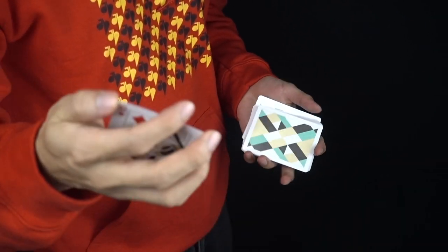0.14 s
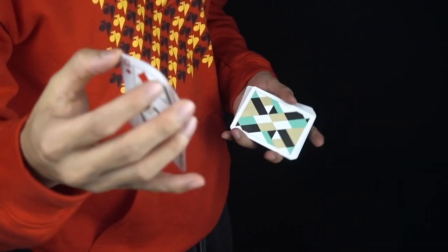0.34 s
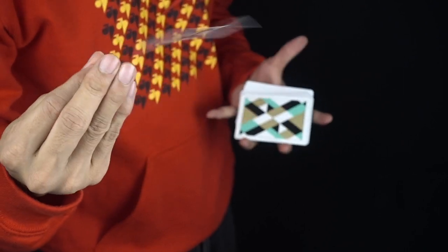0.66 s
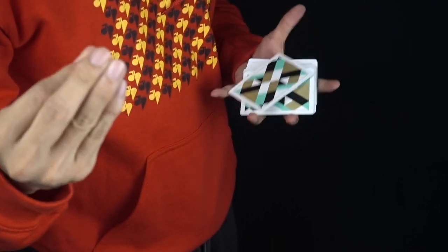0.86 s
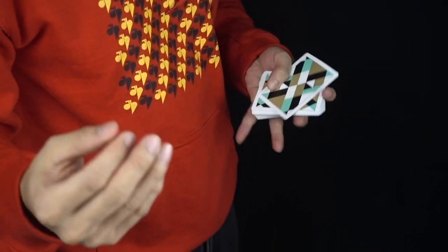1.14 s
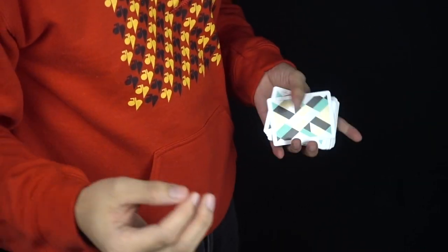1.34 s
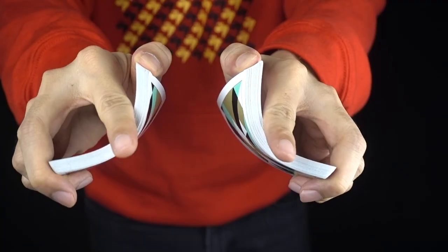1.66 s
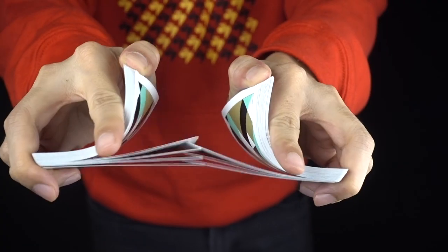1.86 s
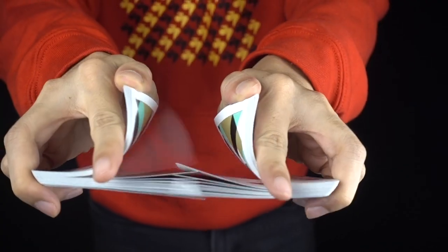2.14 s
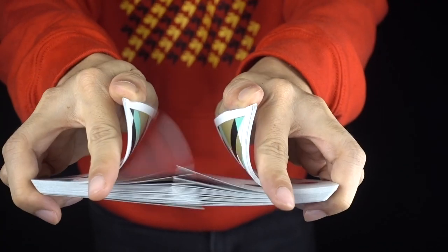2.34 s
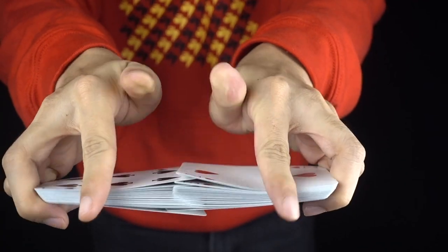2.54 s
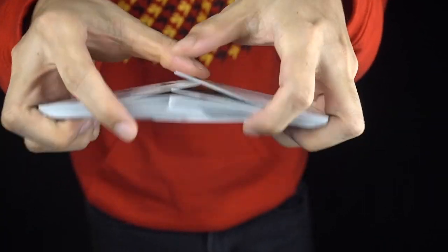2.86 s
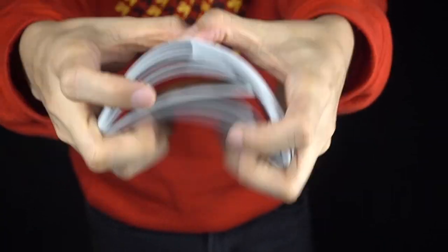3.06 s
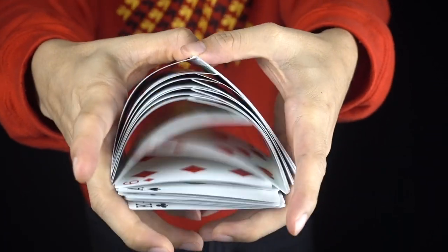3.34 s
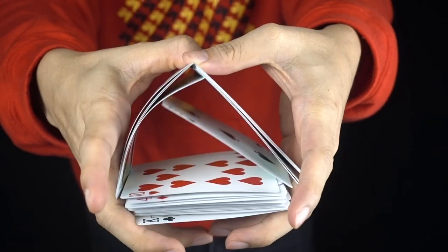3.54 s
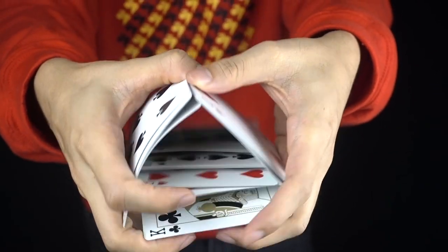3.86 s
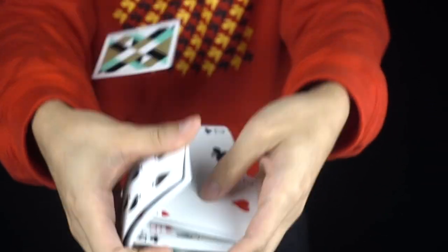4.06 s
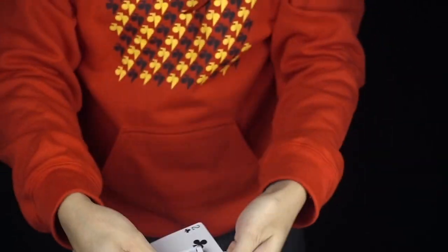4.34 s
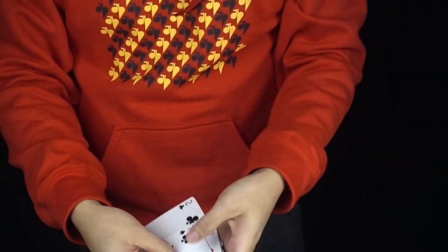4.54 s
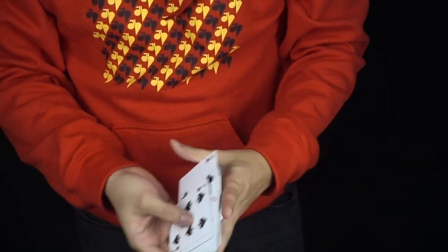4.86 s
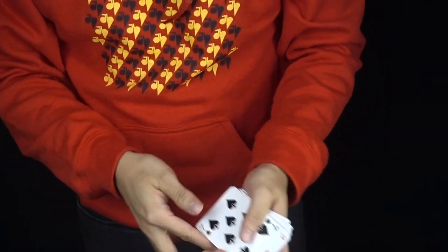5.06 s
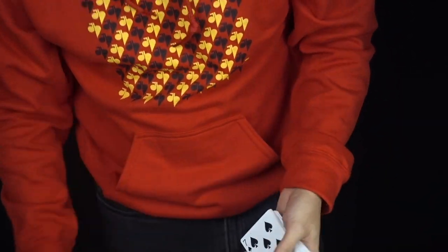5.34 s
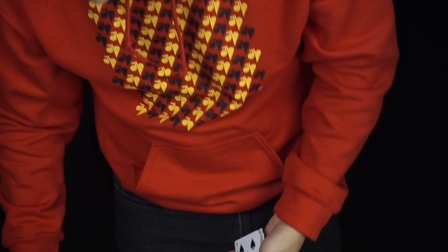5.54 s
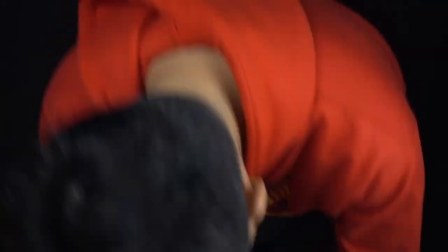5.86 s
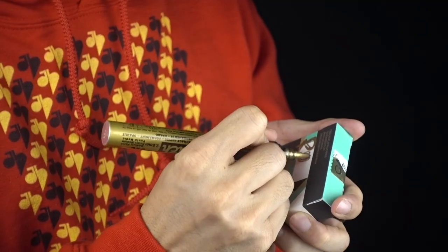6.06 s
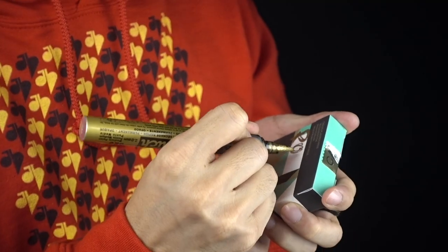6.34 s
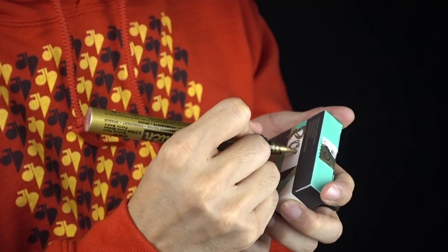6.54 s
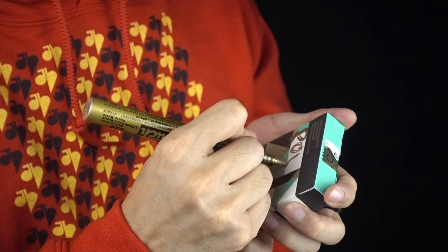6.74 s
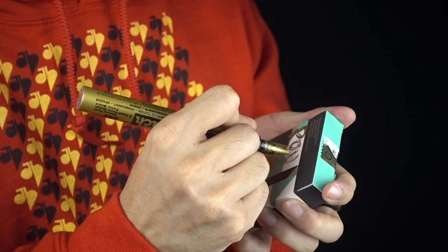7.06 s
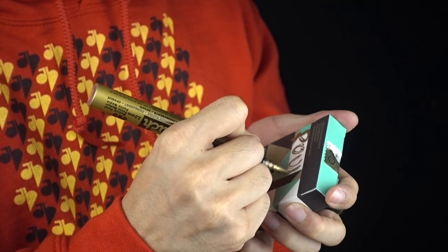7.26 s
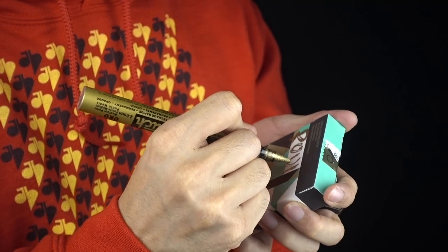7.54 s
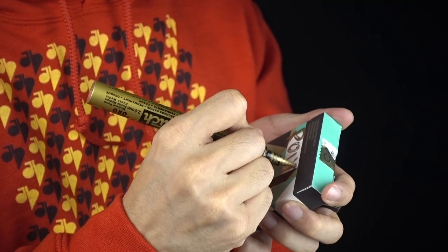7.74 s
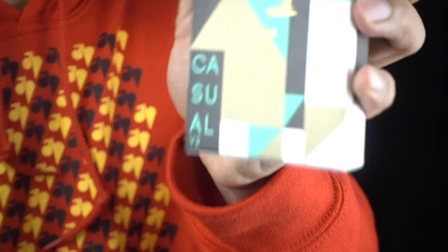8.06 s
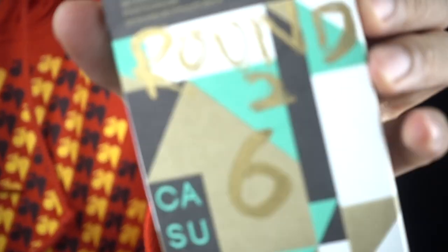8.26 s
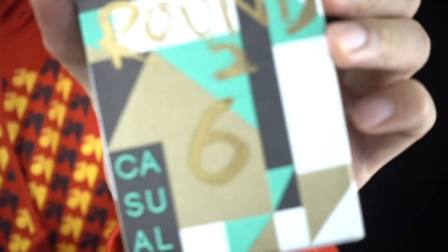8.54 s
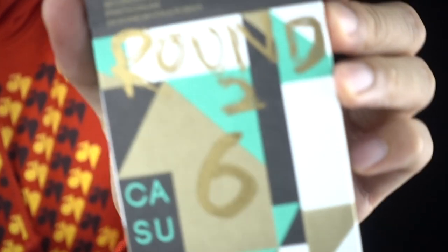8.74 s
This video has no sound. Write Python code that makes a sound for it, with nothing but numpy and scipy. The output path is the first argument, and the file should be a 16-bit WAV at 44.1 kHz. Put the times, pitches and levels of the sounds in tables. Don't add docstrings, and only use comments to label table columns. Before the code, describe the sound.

Close stereo microphones in a small quiet room. A single sharp card slap comes first, then a crisp riffle of ticking card edges ending in two harder snaps. A soft airy bridge flutter follows, then light fumbling and a loud burst of cards hitting the floor with a flat second landing. Later, faint felt marker rubs on a hollow card box and tiny finger touches, over ventilation hum and hiss.

```python
import sys
import numpy as np
from scipy import signal
from scipy.fft import rfft, irfft, next_fast_len
from scipy.io import wavfile
from scipy.ndimage import map_coordinates

SR = 44100
rng = np.random.default_rng(int(sys.argv[2]) if len(sys.argv) > 2 else 0)


def attenuation_scalar(level_db):
    decades = np.asarray(level_db, float) / 20
    return 10 ** decades


def pcm_store(signal):
    levels = np.round(np.clip(np.atleast_2d(signal), -1, 1) * 32767)
    wavfile.write(sys.argv[1], SR, levels.astype(np.int16).T)


N = 392479

# t/s, pressure level/dB, cupping of the hands/0-1
HAND_PRESSURE = [
    [(1.8, -56, 0.6), (1.81, -41, 0.76), (2.0, -48, 0.93), (2.04, -40, 0.6), (2.348, -31.5, 0.16),
     (2.48, -36, 0.54), (2.574, -26.5, 0.35), (2.586, -45, 0.4), (2.64, -42, 0.44)],
    [(3.05, -76, .4), (3.125, -61, 0), (3.145, -37, 0.04), (3.256, -32, 0.39), (3.296, -36, 0.1),
     (3.402, -36, 0), (3.45, -37, 0), (3.558, -33, 0.24), (3.64, -57, 0.3)],
]


def unit(x):
    return x / np.sqrt(np.mean(x ** 2) + 1e-20)


def along(points, hz):
    f, v = np.transpose(points)
    return np.interp(np.log(hz + 1), np.log(f + 1), v)


def curves(tables):
    t, silence_db = np.arange(N) / SR, -150
    total = 0
    for table in tables:
        s, *columns = np.transpose(table)
        total = total + np.array([np.interp(t, s, c - silence_db, 0, 0) for c in columns])
    return silence_db + total


def swells(s, db, rise, held, fall):
    t = np.arange(N) / SR - s
    below_db = np.maximum(-t * rise, (t - held) * fall)
    return attenuation_scalar(db - np.maximum(below_db, 0))


def placed(times, shapes):
    at = np.round(times * SR).astype(int) + np.arange(shapes.shape[1])
    return np.bincount(at.ravel(), shapes.ravel(), N + SR)[:N]


def filtered(x, response):
    m = next_fast_len(N + SR // 2)
    return irfft(rfft(x, m) * response(np.fft.rfftfreq(m, 1 / SR)), m)[..., :N]


def colour(spectrum):
    return lambda hz: attenuation_scalar(along(spectrum, hz))


def modes(table):
    def response(f):
        total = 0
        for k, (centre, width, db) in enumerate(table):
            damping = 1j * f * width
            total = total + (-1) ** k * attenuation_scalar(db) * damping / (centre * centre - f * f + damping)
        return total
    return response


def gritty(rate_hz, depth_db, response):
    knots = rng.standard_normal(int(N * rate_hz / SR) + 4)
    jumps = attenuation_scalar(depth_db * map_coordinates(knots, [np.arange(N) * rate_hz / SR], order=1))
    return unit(filtered(jumps * rng.standard_normal(N), response))


def spread(pair, alike):
    turn = lambda hz: np.arccos(np.clip(along(alike, hz), -1, 1)) / 2
    mid, side = filtered(pair, lambda hz: np.array([np.cos(turn(hz)), np.sin(turn(hz))]))
    return np.array([mid + side, mid - side])


def air():
    # f/Hz, density level/dB
    vent_spectrum = [(41, -33.5), (70, -7), (179, -6), (217, -9.5), (272, -1.5), (342, -8.5), (444, -3.5),
                     (566, -10), (686, -5), (972, -12), (1060, -8.5), (1240, -12.5), (2090, -10.5),
                     (4500, -29.5), (5850, -51.5), (9900, -120)]
    hiss_spectrum = [(1470, -23), (2500, 0), (15100, -5), (16000, -7.5), (16500, -33)]
    # f/Hz, likeness/0-1
    diffuse_likeness = [(60, 0.97), (240, 0.88), (950, 0.48), (3770, 0.059), (15000, 0.01)]
    # t/s, level/dB
    background_level = [(0, 0.5), (1.75, 0.5), (1.8, 0.5), (3.1, 3), (3.7, 4.5), (5, 3.5), (5.9, 1.25), (8.9, 0)]
    # t/s, level/dB
    traffic_level = [(0, -79), (1.8, -84), (3.7, -82), (7.8, -75.5), (8.9, -70.5)]
    vent_db, hiss_db, hiss_growth = -59, -65, 1.7
    (background_db,), (traffic_db,) = curves([background_level]), curves([traffic_level])

    def layer(spectrum):
        noise = filtered(rng.standard_normal((2, N)), colour(spectrum))
        return unit(spread(noise, diffuse_likeness))

    vent = attenuation_scalar(vent_db + background_db) * layer(vent_spectrum)
    hiss = attenuation_scalar(hiss_db + hiss_growth * background_db) * layer(hiss_spectrum)
    traffic = attenuation_scalar(traffic_db) * layer([(15, -42.5), (30, 4.5), (60, -2.5), (90, -10.5), (130, -41)])
    return vent + hiss + traffic


def room(x):
    # f/Hz, t60/s
    decay_t60 = [(200, 0.352), (1400, 0.26), (3700, 0.36), (10000, 0.3)]
    # f/Hz, likeness/0-1
    answer_likeness = [(100, 1), (1000, 0.88), (2500, 0.87), (5000, 0.), (12000, 0.1)]
    hz, t, z = signal.stft(rng.standard_normal((2, SR // 2)), SR, nperseg=256)
    tail = signal.istft(z * attenuation_scalar(-60 * t / along(decay_t60, hz)[:, None]), SR, nperseg=256)[1]
    tail = tail / np.linalg.norm(tail[0])
    late = signal.fftconvolve(np.pad(x, (300, 0))[None], tail, axes=1)[:, :N]
    walls = colour([(200, -12.5), (1000, -8.5), (2500, -8.0), (6000, -8.0), (14000, -12.0)])
    return spread(filtered(late, walls), answer_likeness)


def panel(x):
    # delay/s, level/dB
    echoes = [
        (.0098, -5),
        (.0195, -15),
        (.031, -19),
    ]
    # from t/s, to t/s
    facing_span = (1.7, 2.7)
    copies = sum(attenuation_scalar(db) * np.roll(x, round(s * SR)) for s, db in echoes)
    facing = np.interp(np.arange(N) / SR, facing_span, [1, 1], .4, .4)
    return facing * filtered(copies, colour([(2000, -12), (4500, -1), (12000, 0)]))


def ports(x):
    # f/Hz, phase/rad
    port_phase = [(2900, 0), (3600, .8), (4350, 2.6), (5100, 1.7), (6000, 0), (12000, .1)]
    # f/Hz, level/dB
    scatter_spectrum = [(800, -34.5), (2500, -10.5), (4500, -2.5), (8000, -5), (14000, -7)]
    # from t/s, to t/s
    off_axis = [
        (.69, .85),
        (4.43, 4.95),
    ]
    n = np.arange(N)
    away = x * sum((n > a * SR) & (n < b * SR) for a, b in off_axis)
    lead = lambda hz: np.exp(.5j * along(port_phase, hz) * np.array([[1], [-1]]))
    front = filtered(np.array([x - away] * 2), lead)
    dulled = filtered(away, colour([(8000, -2), (14000, -6.0)]))
    restless = unit(filtered(rng.standard_normal(N), colour([(150, 0.0), (400, -44.5)])))
    side = filtered(x * restless, colour(scatter_spectrum))
    return front + dulled + np.array([side, -side])


def fingers():
    # t/s, f/Hz, level/dB, half length/s
    palm_pop = (.553, 635, -45, .007)
    # t/s, level/dB
    squeak_level = [
        [(8.44, -67), (8.475, -70), (8.5, -60), (8.54, -62), (8.543, -50), (8.56, -66), (8.6, -62), (8.62, -80)],
    ]
    s, hz, db, half_s = palm_pop
    t = np.arange(N) / SR - s
    pop = attenuation_scalar(db) * np.exp(-(t / half_s) ** 4) * np.sin(2 * np.pi * hz * t)
    slip = gritty(rate_hz=75, depth_db=1.0, response=colour([(2350, -35.0), (2680, 0.), (3050, -34)]))
    return pop + attenuation_scalar(curves(squeak_level)[0]) * slip


def marker():
    # t/s, swelling/dB per s, held/s, pressure level/dB, box over barrel/dB
    strokes = [(6.02, 9000, 0.041, -42, -15), (6.048, 402, 0.02, -43, -7), (6.16, 402, 0.018, -52, -8),
               (6.759, 448, 0.066, -48, -8), (6.884, 500, 0.081, -42, -12), (6.612, 898, 0.011, -66, -5),
               (7.215, 2000, 0.073, -62.5, -9), (7.335, 137, 0.026, -48, -11), (7.385, 300, 0.011, -59, -6),
               (7.462, 998, 0.0086, -50, -10), (7.78, 1500, 0.018, -64, -17), (7.88, 800, 0.0027, -62, -17),
               (7.995, 200, 0.017, -51, -5)]
    # f/Hz, width/Hz, level/dB
    barrel_modes = [(3920, 1400, -4), (5030, 1300, -4.5), (6170, 1700, -1), (9400, 1800, -9),
                    (11200, 1300, -10.5), (15400, 1600, -20)]
    box_modes = [(2300, 880, 0)]
    s, rise, held, db, box_db = np.transpose(strokes)[:, :, None]
    high = swells(s, db, rise, held, fall=700).sum(0)
    low = swells(s, db + box_db, rise, held, fall=450).sum(0)

    def barrel_power(hz):
        return sum(attenuation_scalar(db) * abs(modes([(c, w, 0)])(hz)) ** 2 for c, w, db in barrel_modes)

    barrel = gritty(rate_hz=110, depth_db=1.5, response=barrel_power)
    box = gritty(rate_hz=210, depth_db=1.5, response=lambda hz: modes(box_modes)(hz) ** 2)
    return high * attenuation_scalar(-5.0) * barrel + low * attenuation_scalar(-1.5) * box


def packet():
    # t/s, swelling/dB per s, held/s, level/dB, fading/dB per s
    groans = [(.708, 5002, 0.0072, -33.5, 262), (3.945, 1500, 0.013, -51.5, 300),
              (4.103, 500, 0.0022, -45, 902), (4.13, 400, 0.0096, -56, 404), (4.457, 2500, 0.024, -25, 152),
              (4.747, 6000, 0.0065, -36, 223), (6.02, 5000, 0.0084, -55.5, 300),
              (6.056, 500, 0.038, -53.5, 300), (6.8, 200, 0.076, -58, 400), (7.33, 153, 0.045, -57, 300),
              (7.99, 250, 0.023, -61, 600)]
    # f/Hz, width/Hz, level/dB
    stack_modes = [(608, 330, -5.5), (1290, 591, 1.5), (1740, 950, 0)]
    s, rise, held, db, fall = np.transpose(groans)[:, :, None]
    voice = gritty(rate_hz=180, depth_db=3.0, response=lambda hz: modes(stack_modes)(hz) ** 2)
    return swells(s, db, rise, held, fall).sum(0) * voice


def slides():
    # t/s, face rub level/dB, edges over faces/dB, fading/dB per s, cupping/0-1
    slips = [(0.709, -28, -30, 302, 0.35), (1.794, -36, -9, 300, 0.8), (3.33, -48, -7, 250, 0),
             (3.382, -43, -12, 252, 0.14), (3.555, -34, -26, 300, 0.1), (4.092, -37.5, -19, 151.5, 0.6),
             (4.446, -24, -18, 199, 0.88), (4.456, -20, -3, 194, 0.86), (4.999, -53.5, 3, 103, 0.2),
             (0.938, -47, -10, 154, 0.34), (2.352, -49, -31, 124, 0), (1.8, -32.5, -1, 337, 0.1),
             (1.87, -34, -3, 122, 0.1), (2.016, -64, 2, 152, 0.4), (3.94, -38.5, -10, 123, 0.5),
             (4.122, -41, -9.5, 180, 0), (4.463, -14.5, -3, 401, 0.3), (4.484, -21.5, -4, 149.5, 0.05),
             (4.564, -31.5, 0.5, 127, 0.66), (4.744, -20.5, -12.5, 201, 0.29), (8.157, -60, 11.5, 200, 0.4),
             (8.542, -63, 22, 198, 0.23), (5.024, -60, -1, 121, 0.1)]
    # t/s, level/dB
    surges = [(3.143, -39), (3.222, -28), (3.238, -51), (3.255, -45), (3.282, -35), (3.308, -39),
              (3.33, -30), (3.367, -40), (3.385, -28), (3.395, -31), (3.434, -30), (3.479, -41),
              (3.487, -36), (3.517, -32.5), (3.549, -35), (3.569, -51), (3.972, -39), (4.135, -39)]
    # f/Hz, density level/dB
    fizz_spectrum = [(2530, -21.5), (4300, -7.5), (7700, -0.5), (8360, -1.5), (10400, 1), (15100, -4),
                     (16000, -15)]
    rumble_spectrum = [(71, -33.5), (120, -3.5), (442, -3.5), (487, -1.5), (1000, -7), (1300, -29),
                       (2200, -120)]
    # f/Hz, width/Hz, level/dB
    cupped_modes = [(1650, 860, 10.5), (2370, 2900, -0.5)]
    open_modes = [(2600, 680, 1), (3400, 640, 0), (4395, 1060, -4.5)]
    edges_db, stir_db, stir_cupped_db, fan_db = [-12, 4], [-14.5, -29.5], [13, 47], [-25, -51]
    jolt = 8994
    s, db, edge_db, fade, cupping = np.transpose(slips)[:, :, None]
    slip = swells(s, db, jolt, 0, fade)
    press_db, hands = np.transpose([curves([table]) for table in HAND_PRESSURE], (1, 0, 2))
    hands = np.clip(hands, 0, 1)

    def over(extra_db):
        return attenuation_scalar(press_db + np.reshape(extra_db, (2, -1))).sum(0)

    rub = slip.sum(0) + attenuation_scalar(press_db).sum(0)
    cupped_rub = (cupping * slip).sum(0) + (hands * attenuation_scalar(press_db)).sum(0)
    cup = np.clip(cupped_rub / rub, 0, 1)
    fizz = swells(s, db + edge_db, jolt, 0, 1.24 * fade).sum(0)
    fizz = fizz + over(edges_db)
    surge_s, surge_db = np.transpose(surges)[:, :, None]
    fizz += swells(surge_s, surge_db, rise=1100, held=0, fall=800).sum(0)
    wind = swells(s, db + np.minimum(edge_db, 0) - 14, jolt, 0, fade).sum(0)
    wind = wind + over(np.c_[stir_db] + np.c_[stir_cupped_db] * hands)

    edges = fizz * attenuation_scalar(-4.5) * gritty(rate_hz=280, depth_db=3.0, response=colour(fizz_spectrum))
    closed = np.sqrt(cup) * gritty(rate_hz=160, depth_db=4.0, response=modes(cupped_modes))
    apart = np.sqrt(1 - cup) * gritty(rate_hz=130, depth_db=4.0, response=modes(open_modes))
    stir = wind * attenuation_scalar(-5.5) * gritty(rate_hz=89, depth_db=3.5, response=colour(rumble_spectrum))
    fan_colour = colour([(20, -27.5), (45, 8.0), (100, 0.0), (160, -48.0)])
    fan = over(fan_db) * gritty(rate_hz=15, depth_db=3.0, response=fan_colour)
    return edges + rub * attenuation_scalar(-5.0) * (closed + apart) + stir + fan


def crowd():
    # from t/s, to t/s, rate/cards per s, edge over pressure/dB, face over pressure/dB
    flutter = [
        (1.811, 2.547, 54, -14, -17),
        (3.154, 3.57, 110, 2.5, -10),
    ]
    scatter_db, slap_hz, slap_spread = 1.5, 2350, 0.16
    rows = []
    for (start, end, rate, edge_db, face_db), table in zip(flutter, HAND_PRESSURE):
        press_s, press_db = np.transpose(table)[:2]
        luck = rng.standard_normal((64, 4))
        s = start + (np.arange(64) + 0.28 * luck[:, 0]) / rate
        level = np.interp(s, press_s, press_db) - 99 * (s > end)
        db = level + scatter_db * luck[:, 1:3].T + [[edge_db], [face_db]]
        hz = slap_hz * np.exp(slap_spread * luck[:, 3])
        rows += list(np.transpose([s, *db, hz]))
    return rows


def contacts():
    # t/s, edge tick level/dB, face slap level/dB, slap f/Hz riffled cards heard one by one,
    # clear and faint
    riffle_hits = [(1.8003, -24.5, -23.5, 2800), (1.827, -33, -27, 2920), (1.8665, -24, -28, 1590),
                   (1.8865, -29, -37, 2740), (1.9165, -30, -32, 2630), (1.9344, -28.5, -36, 2590),
                   (2.0044, -35, -36, 2950), (2.0147, -22.5, -23, 3230), (2.0525, -34, -35, 2300),
                   (2.108, -25, -23, 2720), (2.1325, -31.5, -49, 2510), (2.1667, -29, -30, 2370),
                   (2.197, -22, -25, 2070), (2.2162, -30, -32, 1650), (2.2276, -27, -30, 3180),
                   (2.2655, -29.5, -33, 2590), (2.2905, -24, -27, 2470), (2.313, -39, -30, 2000),
                   (2.3342, -23, -23, 1960), (2.3522, -27, -20, 2370), (2.4118, -31, -26, 1650),
                   (2.4481, -30, -31, 2200), (2.4648, -28, -24, 2900), (2.4957, -21.5, -21, 3400),
                   (2.5016, -22.5, -44, 3170), (2.514, -25, -24, 1790), (2.5194, -24.5, -24, 2800),
                   (2.5283, -34, -10, 2300), (2.5432, -24, -28.5, 2420), (2.5678, -22.5, -10, 1780),
                   (1.8497, -38, -39, 1400), (1.856, -43.5, -38, 2000), (1.909, -36, -32, 2000),
                      (1.956, -40, -48, 1500), (1.9955, -47, -46, 2500), (2.032, -47, -38, 2200),
                      (2.0358, -37, -44, 2500), (2.059, -36, -40, 2600), (2.0774, -39, -45, 1610),
                      (2.098, -45, -37, 1500), (2.158, -40, -46, 1500), (2.2755, -27, -36, 2300),
                      (2.406, -43, -36, 2500), (2.184, -32.5, -37, 2500), (2.249, -33, -44, 2500),
                      (2.251, -31, -31, 1510), (2.316, -36, -38, 2000), (2.364, -37, -26, 2700),
                      (2.37, -49, -29, 2500), (2.388, -51, -31, 2400), (2.414, -27, -45, 3300),
                      (2.4375, -51, -41, 2000), (2.4554, -38, -30, 2300), (2.467, -34, -27, 3000),
                      (2.5387, -26, -30, 2000), (2.5617, -33.5, -27, 2500)]
    slap_hits = [(.7047, -26, -26, 2260), (.708, -40, -8, 2500), (0.7102, -47, -15, 1860),
                 (0.7124, -41, -9.5, 1960), (0.7176, -49, -20.5, 2600), (.744, -55, -26, 1800),
                 (4.1046, -26.5, -31, 2010), (4.1017, -33.5, -31, 1906), (4.1342, -45, -30, 2015),
                 (4.4482, -50, -24, 1770), (4.4575, -24, -17, 1914), (4.4605, -28.5, -15.5, 2300),
                 (4.4637, -18, -4.5, 2610), (4.4665, -29.5, -11, 2300), (4.4683, -25, -9, 2690),
                 (4.469, -30.5, -14, 2000), (4.4722, -15.5, -9, 2350), (4.4748, -21, -5.5, 2350),
                 (4.4768, -25.5, -12.5, 2880), (4.4845, -35.5, -21, 2900), (4.488, -36.5, -17, 2700),
                 (4.492, -37.5, -16, 2300), (4.5063, -39, -20, 2250), (4.5003, -34.5, -17.5, 2970),
                 (4.523, -31, -20.5, 2900), (4.5506, -25.5, -20, 2110), (4.5717, -37, -23, 2630),
                 (0.727, -53, -37, 2300), (.7215, -50, -21.5, 2830), (0.7327, -55, -26, 1900)]
    arch_hits = [
        (3.1514, -39, -47, 2370),
        (3.155, -45, -30, 2400),
        (3.196, -32, -21, 2970),
        (3.236, -42, -25.5, 1670),
        (3.2517, -31, -35, 1820),
        (3.2671, -36, -39, 1600),
        (3.516, -32.5, -31, 2370),
    ]
    touch_hits = [(0.919, -51, -56, 2400), (0.929, -49, -53, 2400), (0.939, -47, -37, 2450),
                  (0.9536, -35, -37, 3000), (1.089, -53, -50, 2900), (1.211, -54, -48, 2800),
                  (1.342, -52, -46.5, 2770), (2.77, -44, -45, 2070), (2.7817, -37, -34.5, 1970),
                  (3.018, -52, -40.5, 2760), (3.0787, -45, -59, 1960), (3.1013, -73, -41, 2400),
                  (3.938, -37, -40, 2630), (3.9693, -39, -59, 2220), (4.002, -34, -50, 2400),
                  (4.0534, -43, -59, 2600), (4.1254, -31, -43, 1950), (4.1524, -40.5, -37.5, 2180),
                  (4.1787, -36.5, -38, 2370), (4.3542, -57.5, -49, 2700), (4.4146, -44, -49.5, 2610),
                  (5.5634, -53.5, -45.5, 1940), (3.9155, -52, -60, 2400), (4.0105, -44, -55, 2400),
                  (4.189, -51, -54.5, 2370), (8.072, -48, -43, 3570), (8.0721, -60, -49, 1910),
                  (8.0725, -60, -40, 2600), (8.137, -36.5, -46, 2780), (8.156, -38.5, -50, 2770),
                  (8.5414, -34, -40, 2850), (8.593, -48, -55.5, 2630), (3.897, -49, -62, 2400),
                  (4.3, -59, -47, 1990), (7.2135, -53, -56, 2300), (6.617, -55, -64, 2300),
                  (6.66, -56, -66, 2300)]
    landing_hits = [
        (4.7447, -26, -14, 2385),
        (4.7471, -31, -16.5, 2830),
        (4.749, -31, -17.5, 1900),
        (4.754, -45, -26, 1500),
        (4.7645, -48, -18, 2400),
        (4.7695, -44, -16, 2600),
        (4.7865, -49, -17, 2300),
        (4.856, -56, -30, 2250),
    ]
    # level/dB for riffle, slaps, arch, touches, landing
    trapped_air_db = [-28, -26, -6, -10.5, -34]
    face_t60 = [0.0041, 0.0062, 0.004, 0.0047, 0.0085]
    kinds = [riffle_hits, slap_hits, arch_hits, touch_hits + crowd(), landing_hits]
    rows, counts = np.concatenate(kinds), [len(k) for k in kinds]
    trapped_db = np.repeat(trapped_air_db, counts) + 4.5 * rng.standard_normal(len(rows))
    push_db = rows[:, 2] + trapped_db
    return *rows.T[:, :, None], push_db[:, None], np.repeat(face_t60, counts)[:, None]


def cards():
    # f/Hz, density level/dB
    tick_spectrum = [(1500, -21.5), (3500, -2.5), (6000, -1), (9000, -1.5), (12500, -3.5), (16000, -5)]
    crack_spectrum = [(70, -62), (140, -14), (600, -11), (1200, 2.5), (3300, 4), (5000, -15.5),
                      (7500, -26.5)]
    # t/s, level/dB
    puffs = [(1.85, -39), (1.8676, -37), (1.8868, -40), (1.899, -39), (1.9351, -30.5), (1.9573, -36),
             (2.005, -34), (2.0308, -32), (2.0519, -32), (2.0779, -43), (2.148, -42), (2.157, -38),
             (2.1834, -38), (2.218, -31), (2.2514, -40), (2.275, -33), (2.3348, -33), (2.356, -30),
             (2.3932, -31), (2.4118, -32), (2.448, -29), (2.4653, -53), (2.4903, -26), (2.5148, -25),
             (2.5287, -23.5), (2.545, -42), (2.553, -28), (2.5671, -16), (3.152, -32), (3.1958, -28),
             (3.2235, -36), (3.236, -36), (3.2523, -33), (3.2676, -35), (4.1264, -37.5), (4.178, -38.5),
             (0.7081, -25.5), (0.7121, -31)]
    lead_s = .002
    s, tick_db, slap_db, slap_hz, push_db, ring_s = contacts()
    t = np.arange(SR // 40) / SR

    def swell(rise, t60):
        return (1 - np.exp(-t / rise)) * attenuation_scalar(-60 * t / t60)

    drag = swells(lead_s, 0, rise=np.c_[[20000, 60000]], held=np.c_[[.0008, .0002]], fall=8000)
    drag = drag[:, None, :len(t)]
    grain, catch = rng.standard_normal((2, 2, len(s), len(t)))
    scrape = drag * grain * attenuation_scalar(4 * catch)
    scrape /= np.linalg.norm(scrape, axis=2, keepdims=True)
    sagging = np.sin(2 * np.pi * slap_hz * t * (1 - 20 * t))
    flex = swell(rise=0.038 * ring_s, t60=ring_s) * sagging
    push = -swell(rise=0.00017, t60=0.003) * np.sin(2 * np.pi * 480 * t)

    ticks = filtered(placed(s - lead_s, attenuation_scalar(tick_db + 21.5) * scrape[0]), colour(tick_spectrum))
    cracks = filtered(placed(s - lead_s, attenuation_scalar(slap_db + 13.5) * scrape[1]), colour(crack_spectrum))
    body = placed(s, attenuation_scalar(slap_db + 8.5) * flex + attenuation_scalar(push_db + 6.5) * push)
    puff_s, puff_db = np.transpose(puffs)[:, :, None]
    body = body + placed(puff_s, attenuation_scalar(puff_db + 11.0) * push)
    small_source = lambda hz: (1j * hz / (110 + 1j * hz)) ** 2
    return ticks + cracks + filtered(body, small_source)


def scene():
    hands = cards() + packet() + slides() + marker() + fingers()
    balance = attenuation_scalar([[-.3], [.3]])
    return balance * (ports(hands + panel(hands)) + room(hands)) + air()


def band_limit(x):
    return signal.sosfilt(signal.butter(12, 16960, fs=SR, output="sos"), x)


def record(dry):
    headroom, top_hz = .85, 16100
    flattened = dry / (1 + (dry / headroom) ** 4) ** 0.25
    band = colour([(top_hz - 300, 0), (top_hz - 150, -30), (top_hz, -50)])
    return band_limit(filtered(flattened, band))


dry = scene()
out = record(dry)
pcm_store(out)
```